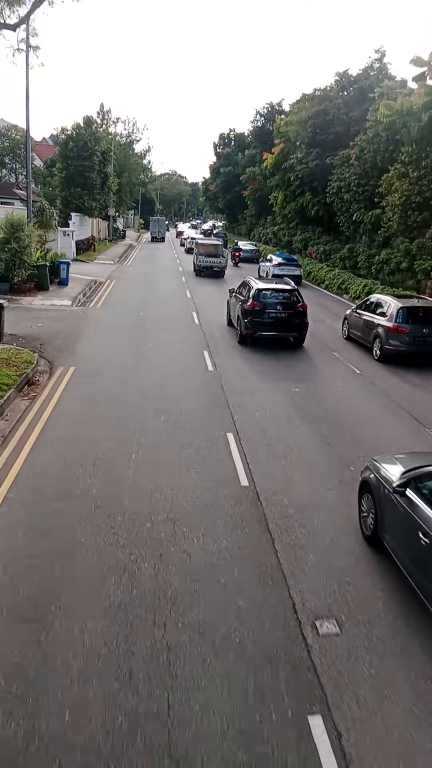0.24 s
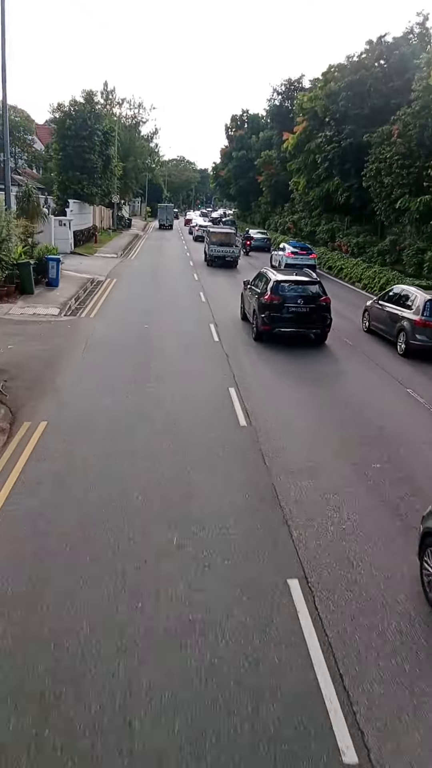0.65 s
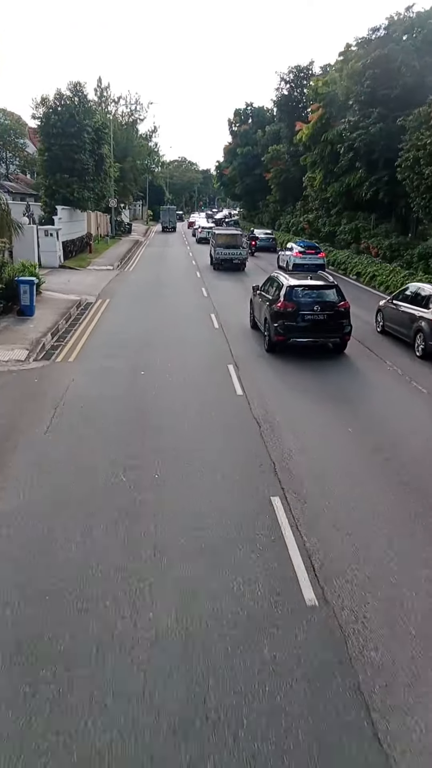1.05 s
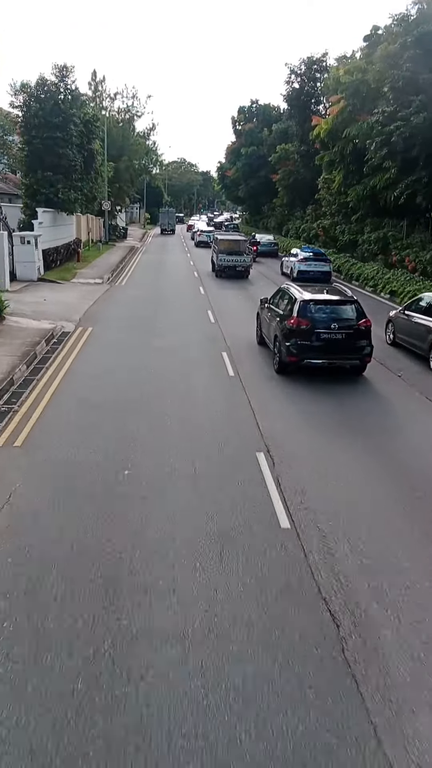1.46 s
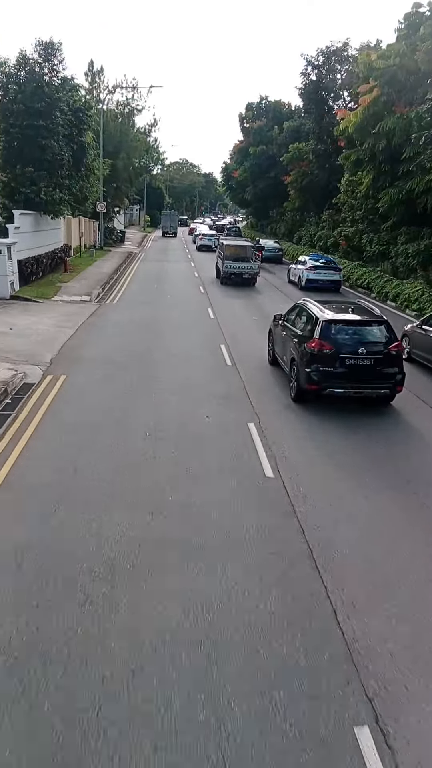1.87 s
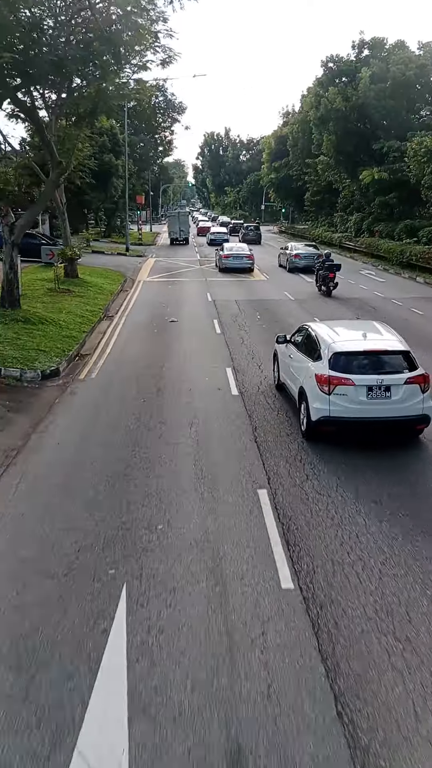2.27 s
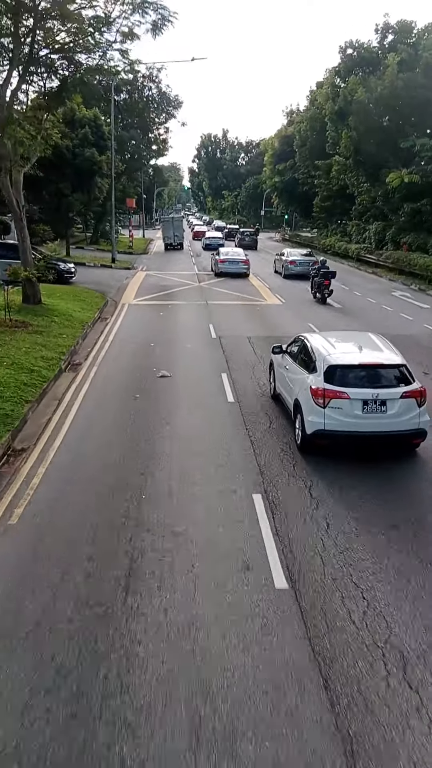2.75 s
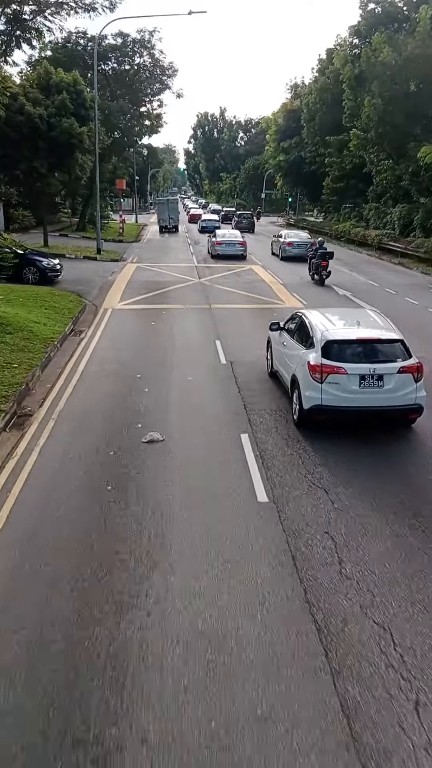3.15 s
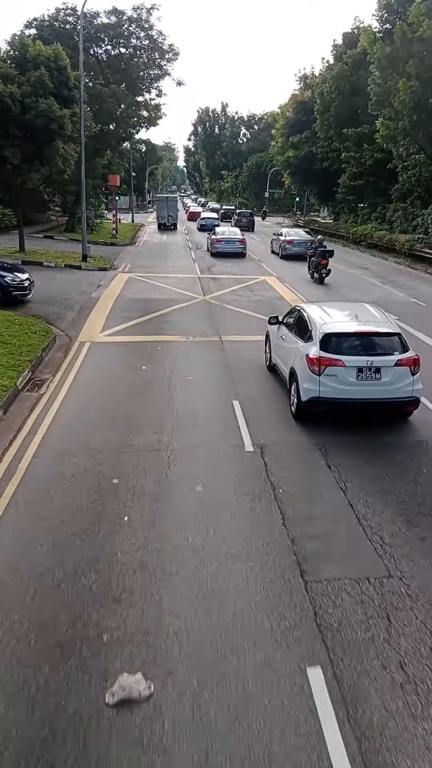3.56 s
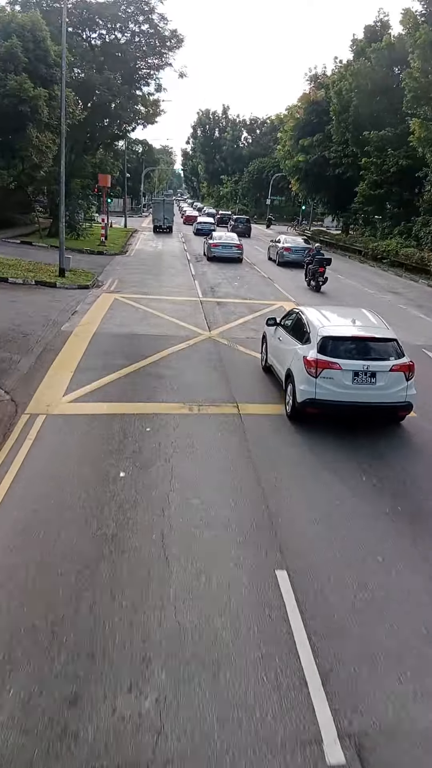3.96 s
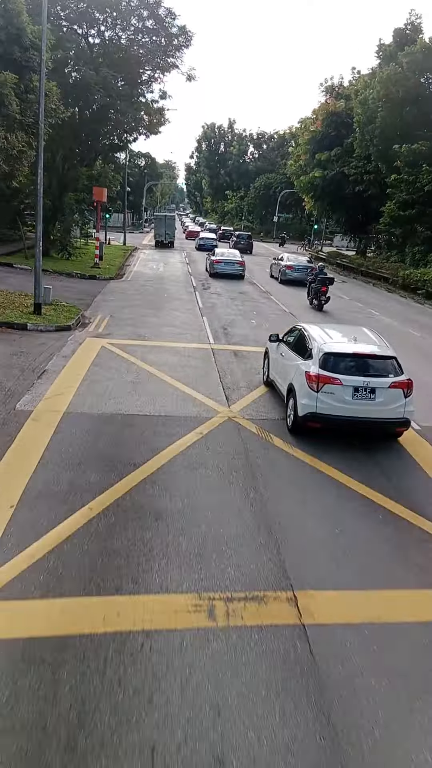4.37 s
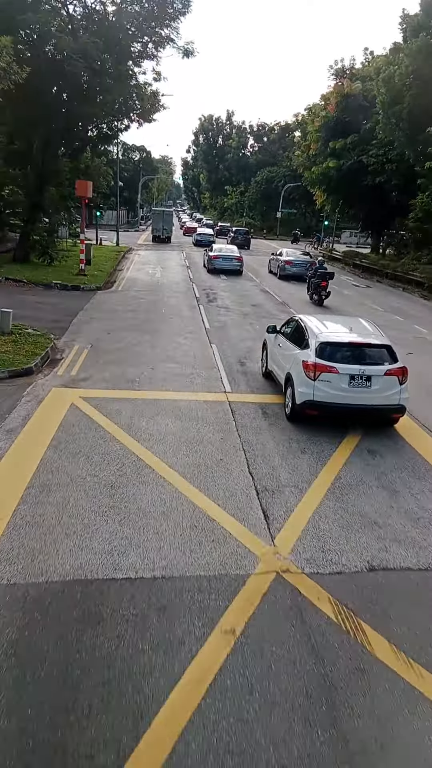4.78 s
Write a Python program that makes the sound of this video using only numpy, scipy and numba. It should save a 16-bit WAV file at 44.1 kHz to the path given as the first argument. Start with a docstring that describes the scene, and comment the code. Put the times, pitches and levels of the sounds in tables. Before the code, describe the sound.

The sound is heard inside a moving bus: a low rumble from the shaking body, with engine and tyres roaring through the floor throughout. From the start, loose trim clacks and taps and panels chatter over a low, wavering engine hum. One hard snap sounds close by at about 0.5 seconds, followed by dense rattling and thudding until about 1.7 seconds. A dry tick falls in a lull near 1.9 seconds. Another burst of clatter runs from about 2.4 to 2.8 seconds. From 3 to 4.3 seconds the ride is quieter, with a few light clacks around 3.5 seconds and a faint engine drone from about 3.8 to 4.4 seconds. Knocks return, with a strong clack near 4.8 seconds. From about 5.1 seconds to the end near 6, the trim and panels rattle hard over a swelling rumble, with a faint tick at 5.6 seconds.

```python
"""Inside a moving bus. The road shakes the body into a low rumble, and the engine and tyres roar through
the floor. At every axle bounce, loose trim clacks and the body shakes on for a moment. Trim taps on its
frame, panels chatter and the engine hums now and then. There is one hard snap close by.
The cabin sound has a deep dip near 5 kHz; two dry ticks sound on top."""
import sys
import numpy as np
from scipy import signal
from scipy.fft import rfft, irfft
from scipy.io import wavfile
from scipy.ndimage import uniform_filter1d
from numba import njit

SR = 44100
rng = np.random.default_rng(int(sys.argv[2]) if len(sys.argv) > 2 else 0)


def unload_audio(sound):
    """Save the sound as a 16-bit wav file, at the path given as the first command line argument."""
    columns = np.transpose(np.atleast_2d(sound))
    # keep every value between -1 and 1, then stretch to whole-number steps
    steps = np.round(np.clip(columns, -1, 1) * 32767)
    wavfile.write(sys.argv[1], SR, steps.astype(np.int16))


N = 269751
TIME = np.arange(N) / SR

# Tone of the body's deep boom and of its rumble (a tone says how strong each pitch is): f/Hz, level/dB
BOOM_TONE = [(18, -55), (22, -15.5), (57, -22), (75, -8), (98, -35), (160, -120)]
RUMBLE_TONE = [(38, -38.5), (65, -3), (124, 2), (194, 1.5), (253, -1.5), (290, -6), (330, -15), (430, -23),
               (730, -120)]
def body_rumble(level_db, jolt_db):
    """The road shakes the body of the bus; each jolt makes the rumble swell."""
    boom = patchy_noise(BOOM_TONE, bands=4, patch_db=5.5, rate_hz=13, flutter_db=5.5)
    rumble = patchy_noise(RUMBLE_TONE, bands=10, patch_db=7, rate_hz=9, flutter_db=0)
    return undb(level_db - 8) * boom + shaken_level(level_db, jolt_db + 2) * rumble


# Tone of the roar in the floor: f/Hz, level/dB
FLOOR_TONE = [(180, -21.5), (300, -6), (459, 0.5), (555, -7), (640, -12.5), (830, -28), (1410, -120)]
def floor_roar(level_db, knock_db):
    """Engine and tyres roar through the floor, louder after each knock."""
    roar = patchy_noise(FLOOR_TONE, bands=6, patch_db=13, rate_hz=10, flutter_db=0)
    return shaken_level(level_db, knock_db - 12.5) * roar


# Tone of the low and of the high tyre roar: f/Hz, level/dB
LOW_TYRE_TONE = [(340, -27), (560, -8), (680, 0.5), (800, -2.5), (950, -16), (1400, -48.5)]
HIGH_TYRE_TONE = [(550, -44.5), (760, -12), (870, -1), (1160, 1), (1400, -7.5), (1750, -45.5), (2280, -33),
                  (3850, -88)]
def tyre_roar(low_db, high_db, knock_db):
    """Rolling tyres roar in two bands; quiet tyres lose the top of their roar."""
    low = patchy_noise(LOW_TYRE_TONE, bands=4, patch_db=9.5, rate_hz=10, flutter_db=1)
    high = patchy_noise(HIGH_TYRE_TONE, bands=6, patch_db=13.5, rate_hz=10, flutter_db=1)
    dullness = np.clip(-45 - high_db, 0, 1)  # sets in below -45 dB
    high = high - dullness * bandpass(high, 1370, 250)
    bounce_db = knock_db - 13.5
    return shaken_level(low_db, bounce_db) * low + shaken_level(high_db, bounce_db) * high


# Tone of a hit's bright edge, of the trim, of the panels and of a knock through the floor: f/Hz, level/dB
EDGE_TONE = [(6180, -37), (10500, 0), (11600, -9.5), (13200, -17), (15500, -33)]
TRIM_TONE = [(2820, -31), (4800, -12), (5550, -9), (6950, 2), (8550, -0.5), (9430, -12.5), (10100, -9),
             (10800, -31), (14000, -42), (22000, -120)]
PANEL_TONE = [(1000, 24), (1700, -1), (1760, -7.5), (2050, -1.5), (3060, -6.5), (3410, -6), (3590, -10),
              (4150, -13), (4800, -42), (6240, -69), (10600, -120)]
KNOCK_TONE = [(70, -30), (130, -2), (230, 2.5), (330, -1), (460, 1), (650, -7.5), (1160, -9.5), (1750, -33),
              (2280, -62.5), (3850, -120)]
# Notes that the body and the loose panels ring with: f/Hz, level/dB, time to fade by 60 dB/s
BODY_RINGS = [(75.7, -27, 0.083), (117, 2.5, 0.11), (185, 10, 0.057), (183.7, 6, 0.48), (275, 10.5, 0.026),
              (393, 10.5, 0.041), (476, -1, 0.05)]
PANEL_RINGS = [(2050, 0, .04), (2380, -2, .04), (2580, 0, .05), (2900, -5, .04), (3340, -2, .04),
               (3720, -3, .04), (3970, -8, .035), (4450, -18, .04), (5430, -17, .04), (5760, -8, .04),
               (6400, -3, .04), (7100, 0, .03), (7800, 0, .04), (8250, 0, .04), (8860, -3, .04),
               (9900, -16, .03)]
TRIM_ABOVE_HZ = 5000  # higher rings follow the trim's level, lower ones the panels'
# Axle bounces: t/s, trim clack level/dB, panel clatter level/dB, knock level/dB, body jolt level/dB
BOUNCES = [(0.017, -35, -58, -40, -20), (0.1095, -45, -31, -22.5, -37), (0.2172, -27.5, -37, -38, -25),
           (0.256, -45, -42, -27.5, -36), (0.3376, -33, -53, -28, -26), (0.406, -28, -57, -30, -31),
           (0.593, -17.5, -33.5, -21.5, -18.5), (0.6473, -16, -27, -21, -15),
           (0.7354, -20, -26, -20.5, -32), (0.811, -26, -29.5, -25, -20), (0.8899, -24, -32.5, -19, -18.5),
           (0.9704, -32, -56, -25.5, -16.5), (1.0522, -29, -41, -25, -18), (1.1099, -31, -47, -24, -37),
           (1.2542, -26, -39, -34, -34), (1.27, -24, -36.5, -19, -33), (1.3375, -26.5, -45, -24, -18),
           (1.436, -27, -49, -22.5, -18), (1.5059, -36, -47, -28, -30), (1.577, -42, -75, -31.5, -22.5),
           (1.659, -29.5, -51, -29.5, -18), (2.394, -21, -34, -22, -23.5), (2.4653, -20, -34, -22, -18.5),
           (2.547, -27, -34.5, -27, -29), (2.611, -20.5, -43, -19.5, -17), (2.7268, -32, -36.5, -25, -23),
           (2.796, -47, -51, -30, -24.5), (2.9658, -42, -68, -34, -25), (3.466, -30.5, -46, -27, -26),
           (3.539, -32.5, -41.5, -26, -38), (3.594, -31.5, -52, -37, -25), (3.679, -35.5, -57, -36, -48),
           (4.3537, -37, -48, -24.5, -32.5), (4.4706, -44, -50, -27.5, -25.5),
           (4.627, -36, -42, -25, -24.5), (4.7198, -29, -40.5, -24, -18.5), (4.787, -19, -37.5, -19, -18.5),
           (4.876, -39, -41.5, -28.5, -22.5), (4.945, -36, -40, -46, -40),
           (5.151, -23, -37.5, -23.5, -24.5), (5.224, -21, -31, -22.5, -19), (5.28, -16.5, -31, -20, -18.5),
           (5.3534, -21.5, -33, -19.5, -23), (5.443, -15, -31.5, -18, -16.5), (5.509, -46, -37, -25, -25.5),
           (5.531, -23.5, -44, -25, -37), (5.5805, -36, -35, -24, -20.5), (5.7058, -27, -43, -26, -32),
           (5.8405, -31, -47, -25.5, -14.5), (5.849, -16, -35.5, -16.5, -25),
           (5.9162, -17.5, -30, -15, -19.5), (5.999, -25, -31, -33, -30), (6.0046, -23.5, -34.5, -21, -25),
           (6.0947, -29, -56, -27, -26)]
def clacks():
    """Loose parts hit and rebound at each bounce: a crack, a rustling tail, ringing body and panels."""
    times, trim_db, panel_db, knock_db, jolt_db = np.transpose(BOUNCES)
    luck = rng.standard_normal((len(times), len(BODY_RINGS) + len(PANEL_RINGS) + 1))
    rebound_s, rustle_s = 0.0064, 0.21
    rebound = undb(-1 + 2.5 * luck[:, len(BODY_RINGS)])
    edge_db = 2 * trim_db - 14.5  # harder clacks are brighter
    parts = [(EDGE_TONE, edge_db, .03, -4), (TRIM_TONE, trim_db - 19, .03, -5),
             (PANEL_TONE, panel_db - .5, .03, -4), (KNOCK_TONE, knock_db - 2, .05, -5)]
    out = 0
    for tone, part_db, crack_s, tail_db in parts:
        size = undb(part_db)
        hits = impulses(times, size) + impulses(times + rebound_s, size * rebound)
        crack_power = fade(hits ** 2, crack_s / 2)
        rustle_power = undb(2 * tail_db) * fade(hits ** 2, rustle_s / 2)
        loudness = soften_start(np.sqrt(crack_power + rustle_power), samples=90)
        uneven = undb(1.5 * wander(180))
        out = out + colour(loudness * uneven * rng.standard_normal(N), tone)
    for k, (hz, ring_db, fade_s) in enumerate(BODY_RINGS):
        size = np.tanh(luck[:, k]) * undb(jolt_db + ring_db - 20)
        out = out + ring(impulses(times, size), hz, fade_s)
    for k, (hz, ring_db, fade_s) in enumerate(PANEL_RINGS):
        hit_db = panel_db - 23 if hz < TRIM_ABOVE_HZ else trim_db - 39
        size = np.tanh(luck[:, -k - 1]) * undb(hit_db + ring_db)
        struck = ring(impulses(times, size), hz, fade_s)
        out = out + bandpass(struck, hz, 500)  # the ring takes a moment to build
    return out


def shaken_level(steady_db, bounce_db, rise_s=0.043, fade_s=0.27):
    """Loudness over time: a steady level plus the shaking that each bounce leaves behind."""
    kicks = impulses(np.transpose(BOUNCES)[0], undb(2 * bounce_db))
    shudder = np.sqrt(np.abs(fade(kicks, fade_s / 2) - fade(kicks, rise_s)))
    return np.hypot(undb(steady_db), shudder)


# Tone of a tap's bright middle and of its lower treble: f/Hz, level/dB
TAP_BRIGHT_TONE = [(5000, -50), (6000, -16), (6700, 2), (8550, 0), (9430, -14), (10500, -40)]
TAP_TREBLE_TONE = [(3600, -40), (4800, 4), (5600, 0), (6300, -8), (7200, -40)]
# Sharp taps, often in quick pairs: t/s, then level/dB of bright middle, panel, knock, lower treble, edge
TRIM_TAPS = [(0.0174, -29, -43, -23, -51, -55), (0.1111, -38, -39, -22, -57, -59),
             (0.2169, -26, -37, -24, -43, -39), (0.2269, -24, -41, -29, -52, -49),
             (0.2524, -41, -40, -28, -57, -64), (0.405, -40, -46, -27, -55, -62),
             (0.5921, -28, -41, -29, -56, -41), (0.5964, -25, -40, -22, -42, -46),
             (0.6484, -24, -34, -21, -48, -43), (0.6554, -25, -36, -22, -42, -46),
             (0.7357, -21, -32, -22, -41, -48), (0.7414, -26, -35, -22, -40, -50),
             (0.8066, -34, -40, -23, -55, -58), (0.8124, -34, -39, -23, -55, -55),
             (0.8854, -31, -41, -24, -53, -49), (0.8919, -24, -35, -22, -49, -47),
             (0.9712, -37, -45, -24, -57, -64), (1.051, -34, -43, -29, -53, -53),
             (1.0564, -31, -40, -26, -52, -54), (1.1119, -27, -42, -25, -51, -56),
             (1.1757, -39, -46, -23, -62, -66), (1.2535, -29, -38, -22, -51, -57),
             (1.2715, -28, -38, -19, -48, -53), (1.2814, -33, -41, -24.5, -50, -54),
             (1.3189, -32, -48, -27, -48, -54), (1.3244, -33, -43, -23, -47, -52),
             (1.3404, -30, -43, -22, -48, -58), (1.4017, -35, -47, -26, -56, -59),
             (1.4386, -36, -48, -23, -63, -58), (1.4424, -36, -48, -23, -55, -61),
             (1.5065, -38, -52, -28, -74, -63), (1.5104, -36, -51, -26, -64, -66),
             (1.5768, -44, -61, -30, -74, -76), (1.5814, -42, -58, -27, -70, -73),
             (1.6571, -35, -61, -28, -53, -53), (1.6624, -32, -54, -25, -51, -57),
             (2.3915, -29, -42, -23, -57, -51), (2.3994, -30, -41, -24, -54, -50),
             (2.4034, -29, -38, -26, -46, -50), (2.4648, -29, -42, -25, -42, -48),
             (2.4704, -26, -40, -24, -42, -48), (2.5461, -36, -38, -26, -54, -54),
             (2.613, -27, -40, -22, -51, -46), (2.6164, -26, -40, -22, -40, -53),
             (2.6713, -36, -43, -27, -56, -66), (2.7312, -29, -40, -26, -59, -62),
             (2.7975, -35, -47, -31, -68, -73), (2.9714, -42, -55, -33.5, -69, -75),
             (3.4615, -35, -56, -35, -58, -64), (3.471, -33, -54, -31, -57, -67),
             (3.5932, -37, -55, -34, -61, -66), (4.0272, -49, -57, -33, -80, -69),
             (4.3604, -47, -53, -27, -73, -77), (4.4707, -40, -58, -30, -77, -70),
             (4.4744, -38, -54, -30, -65, -74), (4.6284, -29, -46, -28, -59, -64),
             (4.7192, -34, -50, -27, -66, -70), (4.7406, -38, -47, -30, -69, -67),
             (4.7875, -23, -43, -23, -44, -42), (4.7934, -26, -44, -22, -43, -46),
             (4.8763, -32, -45, -26, -64, -64), (5.1527, -33, -38, -25, -55, -51),
             (5.2245, -24, -34.5, -22, -49, -49), (5.2734, -26, -40, -22, -54, -41),
             (5.2824, -25, -39, -23, -52, -40), (5.2874, -26, -38, -22, -45, -44),
             (5.3517, -30, -45, -23, -58, -48), (5.3554, -29, -39, -21, -48, -51),
             (5.4364, -28, -39, -22, -58, -42), (5.4425, -26, -41, -25, -45, -42),
             (5.4484, -27, -39, -21, -44, -49), (5.5094, -35, -38, -24, -55, -62),
             (5.5308, -30, -43, -24, -51, -54), (5.5802, -29, -39, -25, -56, -57),
             (5.7084, -33, -45, -26, -55, -57), (5.8426, -29, -45, -23, -57, -41),
             (5.8496, -23, -45, -22, -39, -41), (5.8556, -23, -40, -20, -37, -44),
             (5.9165, -22, -37, -18, -45, -47), (5.9214, -22, -37, -18, -39, -49),
             (5.9974, -27, -38, -27, -41, -47), (6.0048, -24, -35, -22, -41, -50),
             (6.0954, -36, -49, -29, -56, -58), (6.1025, -32, -46, -30, -58, -54)]
def taps(tap_s=0.0095, knock_s=0.02):
    """Trim hits its frame: a gritty burst through trim, panels and floor, with a brief panel ring."""
    times, bright_db, panel_db, knock_db, treble_db, edge_db = np.transpose(TRIM_TAPS)
    grit = rng.standard_normal(N)
    luck = rng.standard_normal((len(times), len(PANEL_RINGS)))  # each tap rings its own way
    parts = [(TAP_BRIGHT_TONE, bright_db + .5, tap_s), (TAP_TREBLE_TONE, treble_db + 3, tap_s),
             (EDGE_TONE, edge_db + 1.5, tap_s), (PANEL_TONE, panel_db + 2.5, 2 * tap_s),
             (KNOCK_TONE, knock_db - 2.5, knock_s)]
    out = 0
    for tone, part_db, fade_s in parts:
        loudness = soften_start(fade(impulses(times, undb(part_db)), fade_s), samples=21)
        out = out + colour(loudness * grit, tone)
    for k, (hz, ring_db, fade_s) in enumerate(PANEL_RINGS):
        hit_db = panel_db if hz < TRIM_ABOVE_HZ else bright_db
        size = luck[:, k] * undb(hit_db + ring_db - 21)
        out = out + bandpass(ring(impulses(times, size), hz, fade_s / 2), hz, 900)
    return out


# One hard snap close by: t/s, level/dB
HARD_SNAP = [(.4545, -1.2)]
def snap():
    """A quick pull on the air, then a push that swings back, ringing the microphone's bright peak."""
    times, db = np.transpose(HARD_SNAP)
    t = np.arange(200) / SR - .0003
    pull = -.75 * np.exp(-((t + .00011) / .00012) ** 2)
    push = (t > 0) * .75 * np.cos(2 * np.pi * 700 * t) * np.exp(-t / .0004)
    bright = -.5 * np.cos(2 * np.pi * 7800 * (t + .00004)) * np.exp(-np.abs(t) / .00016)
    crack = np.convolve(impulses(times, undb(db)), pull + push + bright)[:N]
    return signal.sosfilt(signal.butter(2, 13000, fs=SR, output="sos"), crack)


# The engine's low hum, a deeper hum near 50 Hz that stops abruptly, a higher drone: t/s, f/Hz, level/dB
ENGINE_HUM = [(0.0, 82.4, -14), (0.12, 76.5, -52), (0.232, 64.3, -28), (0.518, 62.8, -33),
              (0.64, 73.75, -27), (0.874, 65.2, -30), (1.002, 79.5, -32.5), (1.056, 81, -20.5),
              (1.15, 73.9, -43)]
DEEP_HUM = [(1.2, 50.4, -51), (1.232, 50, -32), (1.442, 49.7, -32), (1.462, 49.3, -31), (1.48, 48.3, -39),
            (1.912, 51.3, -29.5), (1.945, 49.2, -61)]
ENGINE_DRONE = [(3.72, 247, -66), (3.77, 216.4, -48), (3.83, 228, -31.5), (3.86, 221, -47),
                (3.886, 234, -36), (3.922, 217, -40), (3.958, 219, -50), (3.988, 217, -32),
                (4.016, 236.4, -42), (4.082, 226.6, -30.5), (4.112, 231, -47), (4.128, 230, -38),
                (4.144, 226.6, -71), (4.22, 216, -31), (4.244, 221, -47), (4.288, 223, -33.5),
                (4.31, 219, -52), (4.322, 220, -37), (4.348, 221, -48), (4.362, 232.4, -34),
                (4.41, 249, -32), (4.45, 258, -60)]
def engine_note(table, pitch_waver, waver_db):
    """One note of the engine rings in the cabin, wavering in pitch and loudness."""
    times, hz, db = np.transpose(table)
    playing = uniform_filter1d(1. * ((TIME > times[0]) & (TIME < times[-1])), size=1000)
    pitch_hz = np.interp(TIME, times, hz) * (1 + pitch_waver * wander(45))
    loudness = undb(np.interp(TIME, times, db) + waver_db * wander(40))
    return playing * np.sqrt(2) * loudness * np.sin(2 * np.pi * np.cumsum(pitch_hz) / SR)


def loose_contacts(per_s, spread_db):
    """Loose parts touch at random: tiny clicks, a few much bigger than the rest."""
    size = undb(spread_db * np.minimum(rng.exponential(size=N), 4.5)) * rng.standard_normal(N)
    return normalise(size * (rng.random(N) < per_s / SR))


def jingle(contacts, low_hz, high_hz, fade_share, swell_db):
    """The clicks ring now one panel note, now another; the pitches drift as the panels flex."""
    out = 0
    for hz, db, fade_s in PANEL_RINGS:
        if low_hz < hz < high_hz:
            pitch_hz = hz * (1 + .035 * wander(9))
            spin = np.exp(2j * np.pi * np.cumsum(pitch_hz) / SR)
            note = (fade(contacts / spin, fade_share * fade_s) * spin).imag  # rings at the moving pitch
            loudness = undb(db + swell_db * np.minimum(wander(28), .6))
            out = out + loudness * normalise(bandpass(note, hz, 600))
    return normalise(out)


def panel_chatter(contacts, level_db, clatter_db):
    """Loose panels rustle, ring and click, louder after each bounce."""
    rustle = patchy_noise(PANEL_TONE, bands=14, patch_db=16.5, rate_hz=20, flutter_db=4)
    rings = jingle(contacts, 0, TRIM_ABOVE_HZ, fade_share=.97, swell_db=12.5)
    clicks = colour(contacts, PANEL_TONE)
    return shaken_level(level_db, clatter_db - 6.5) * (rustle + .85 * rings + .35 * clicks)


# Tone of the trim's fine, high rattle: f/Hz, level/dB
SIZZLE_TONE = [(2820, -68), (4800, -44.5), (5480, -5), (5930, -34), (6470, 1.5), (8520, 6.5), (8990, 0),
               (9350, -12), (10100, -9), (11600, -32), (15500, -27)]
def trim_sizzle(contacts, level_db, clack_db):
    """Loose trim buzzes: a hiss, high rings, clicks and a faint bright edge, louder after each bounce."""
    hiss = patchy_noise(SIZZLE_TONE, bands=24, patch_db=9.5, rate_hz=24, flutter_db=5)
    rings = jingle(contacts, TRIM_ABOVE_HZ, SR, fade_share=.55, swell_db=12)
    clicks = colour(contacts, SIZZLE_TONE)
    edge = patchy_noise(EDGE_TONE, bands=10, patch_db=3, rate_hz=43, flutter_db=3.5)
    sizzle = hiss + .68 * rings + .39 * clicks + undb(-26.5) * edge
    return shaken_level(level_db, clack_db - 26) * sizzle


# Dry ticks: t/s, level/dB
DRY_TICKS = [(1.936, -24.5), (5.6025, -35)]
def ticks():
    """Each tick is a sudden step that dies away without ringing."""
    times, db = np.transpose(DRY_TICKS)
    return -fade(impulses(times, undb(db)), fade_s=0.016)


# Brief dips and swells in the steady noise: t/s, length/s, f/Hz, width/Hz, level change/dB
DIPS_AND_SWELLS = [(0.545, .08, 2800, 1500, -11), (0.968, .05, 4000, 1000, -13), (.15, .06, 11500, 3000, 6),
                   (.225, .05, 13000, 4000, 10), (1.792, 0.083, 610, 250, -16),
                   (1.87, 0.095, 930, 250, -20), (2.04, 0.048, 960, 250, -13),
                   (2.075, 0.074, 520, 400, -11), (2.13, .06, 905, 250, -8), (2.237, 0.13, 372, 150, -15),
                   (2.335, .08, 970, 200, -4), (3.013, 0.096, 1030, 300, -14), (3.113, 0.078, 550, 250, -7),
                   (3.203, 0.083, 300, 150, -3), (3.217, 0.098, 500, 100, 10.5),
                   (3.3, 0.056, 960, 350, -15), (3.34, 0.17, 540, 200, -14), (3.383, .08, 750, 200, 7.5),
                   (3.658, 0.15, 1040, 300, 3), (3.826, 0.13, 1000, 400, -18), (3.88, .08, 420, 250, -10),
                   (4.023, 0.46, 930, 90, 6), (4.134, 0.22, 642, 150, -10), (4.15, 0.36, 330, 90, -14),
                   (4.22, 0.072, 567, 200, -10), (4.323, 0.065, 790, 200, -10),
                   (4.302, 0.089, 1270, 300, -8), (4.76, 0.086, 3000, 500, -10),
                   (4.818, 0.096, 3840, 700, 9.5), (4.845, .06, 3000, 500, -10),
                   (4.86, .07, 5850, 700, -10), (4.92, 0.078, 5800, 900, -14),
                   (4.932, 0.044, 3300, 1000, -15), (5.002, 0.072, 3200, 500, 6),
                   (5.036, 0.13, 376, 150, -12), (5.07, 0.089, 3200, 900, -14),
                   (5.162, 0.076, 2200, 600, 7), (5.2, .04, 5600, 700, -10), (5.253, 0.045, 3600, 500, -8),
                   (5.66, .05, 11500, 3000, 7), (3.75, .3, 85, 40, 5), (2.92, .04, 8000, 3000, 4),
                   (3.0, .03, 7500, 3000, -5), (3.18, .02, 8000, 3000, -5), (3.74, .07, 1250, 300, -8),
                   (3.93, .08, 1200, 300, -8), (4.12, .18, 1200, 250, -5), (1.0, .8, 1150, 300, -3),
                   (5.797, 0.088, 1800, 600, -4)]
def dip_and_swell(noise):
    """Bands of the noise briefly go hollow or grow louder, then come back."""
    for middle_s, length_s, hz, width_hz, db in DIPS_AND_SWELLS:
        window = np.exp(-(2 * (TIME - middle_s) / length_s) ** 4)
        noise = noise + (undb(db) - 1) * window * bandpass(noise, hz, width_hz)
    return noise


def patchy_noise(tone, bands, patch_db, rate_hz, flutter_db):
    """Noise whose narrow bands swell and fade on their own, plus a flutter they all share."""
    edges = np.geomspace(tone[1][0], tone[-2][0], bands + 1)
    noise = rng.standard_normal(N)
    out = 0
    for low_hz, high_hz in zip(edges, edges[1:]):
        hz, width_hz = np.sqrt(low_hz * high_hz), 1.5 * (high_hz - low_hz)
        band = bandpass(bandpass(noise, hz, width_hz), hz, width_hz)  # twice for steep sides
        out = out + undb(patch_db * np.minimum(wander(rate_hz), .12)) * band  # dips deep, hardly rises
    return normalise(colour(out * undb(flutter_db * wander(24.65)), tone))


def colour(x, tone):
    """Give a sound the tone in a table; plain noise keeps its level."""
    hz, db = np.transpose(tone)
    grid_hz = np.maximum(np.fft.rfftfreq(2 ** 14, 1 / SR), 1)
    gain_db = np.maximum(np.interp(np.log(grid_hz), np.log(hz), db, -80, -80), -80)
    cepstrum = irfft(gain_db * np.log(10) / 20)
    cepstrum[1:2 ** 13] *= 2  # folded so that nothing sounds before its hit (minimum phase)
    cepstrum[2 ** 13 + 1:] = 0
    response = irfft(np.exp(rfft(cepstrum)))
    return signal.fftconvolve(x, response / np.sqrt(np.sum(response ** 2)))[:N]


@njit
def bandpass(x, hz, width_hz):
    """Keep the pitches around hz, at full strength in the middle (a state-variable filter)."""
    out, band_state, low_state = np.empty(len(x)), 0., 0.
    tuning, damping = np.tan(np.pi * hz / SR), width_hz / hz
    for i in range(len(x)):
        band = (band_state + tuning * (x[i] - low_state)) / (1 + tuning * (tuning + damping))
        band_state = 2 * band - band_state
        low_state += 2 * tuning * band
        out[i] = damping * band
    return out


def wander(rate_hz):
    """A smooth random curve that heads for a new value rate_hz times a second."""
    hold = int(SR / rate_hz)
    steps = np.repeat(rng.standard_normal(N // hold + 1), hold)
    return uniform_filter1d(uniform_filter1d(steps, hold), hold)[:N]


def impulses(times, sizes):
    """Silence with one spike at each given time."""
    x = np.zeros(N)
    np.add.at(x, (times * SR).astype(int), sizes)
    return x


def fade(x, fade_s):
    """Give each spike a tail that falls by 60 dB in fade_s."""
    return signal.lfilter([1], [1, -np.exp(-np.log(1000) / (fade_s * SR))], x)


def ring(x, hz, fade_s):
    """Turn each spike into a note that falls by 60 dB in fade_s."""
    return signal.lfilter([1], [1, -np.exp(2j * np.pi * hz / SR - np.log(1000) / (fade_s * SR))], x).imag


def soften_start(x, samples):
    """Average the last few samples, because a hit is never instant."""
    return uniform_filter1d(x, size=samples, origin=(samples - 1) // 2)


def undb(db):
    """Turn decibels into a number to multiply by."""
    return 10 ** (np.asarray(db) / 20)


def normalise(x):
    """Scale a sound to an average power of 1."""
    return x / np.sqrt(np.mean(x ** 2))


# The ride between jolts: t/s, then level/dB of rumble, floor, low tyre, high tyre, panels, trim
RIDE_LEVELS = [(0.0, -25.5, -26.5, -33.5, -32, -41.5, -49), (0.15, -22, -30.5, -40.5, -37.5, -55.5, -50.5),
               (0.31, -28, -31.5, -33.5, -41, -44, -51.5), (0.43, -27, -36, -41.5, -37.5, -52, -60.5),
               (0.61, -24.5, -31, -33, -36, -49, -54), (0.77, -22, -29.5, -37, -35, -44.5, -45.5),
               (0.94, -32.5, -35, -42, -37.5, -51, -57), (1.07, -25, -35, -38, -33.5, -45, -52),
               (1.26, -25.5, -29, -42, -38.5, -55, -54.5), (1.35, -25, -28.5, -40, -36, -45.5, -47),
               (1.5, -30, -34.5, -41, -38, -56.5, -57), (1.58, -37, -37.5, -43, -42.5, -64, -56),
               (1.7, -28.5, -36.5, -37, -39.5, -65, -68), (1.79, -31, -33, -50, -43.5, -58.5, -63),
               (1.89, -26.5, -34.5, -45, -37.5, -67, -64), (1.96, -47, -37, -39, -43, -63.5, -59),
               (2.11, -42.5, -46, -45, -41, -59.5, -55), (2.21, -27.5, -35, -37.5, -43.5, -50.5, -56.5),
               (2.35, -31, -38.5, -41.5, -40, -54, -57), (2.43, -29, -36, -35, -36, -40.5, -46),
               (2.57, -28.5, -34.5, -36, -37, -47, -51.5), (2.64, -29, -34, -41.5, -35, -42.5, -51),
               (2.76, -32, -38.5, -41, -38, -49, -56), (2.93, -33, -39.5, -40.5, -41.5, -60.5, -62),
               (3.12, -39.5, -42.5, -38.5, -46.5, -66, -67), (3.22, -53.5, -47, -52.5, -42, -64.5, -67.5),
               (3.41, -40.5, -49, -44.5, -47, -67, -66), (3.58, -31, -36.5, -44, -42, -60, -56.5),
               (3.68, -44, -48, -39.5, -46.5, -67, -61), (3.76, -36.5, -49, -50.5, -51, -71.5, -80),
               (3.969, -45, -43.5, -40, -48, -69.5, -76), (4.07, -47, -44.5, -42, -41.5, -63.5, -59),
               (4.17, -47.5, -45.5, -41.5, -43, -68.5, -68.5), (4.29, -46, -37.5, -44, -44.5, -63, -68),
               (4.41, -41, -37, -44, -41, -63.5, -61), (4.53, -35.5, -40, -41, -46, -63, -58),
               (4.72, -29.5, -41, -45, -38.5, -66, -62), (4.89, -38, -40, -39, -40.5, -57.5, -56.5),
               (5.11, -25.5, -42, -41.5, -38, -50.5, -53.5), (5.23, -27.5, -38, -36, -35.5, -47.5, -56),
               (5.33, -27.5, -37, -43, -45, -48, -48.5), (5.4, -28, -39, -40, -40, -51, -53),
               (5.49, -29, -33, -37, -36.5, -46.5, -57), (5.64, -35.5, -39, -40.5, -38, -54, -51),
               (5.83, -31.5, -33, -45, -40.5, -57.5, -58.5), (5.91, -23, -41, -38.5, -35, -53, -57),
               (6.01, -25.5, -43, -42, -39, -48, -50), (6.12, -28.5, -36, -39, -38, -49, -54)]
def scene():
    """Add up the cabin sound, give it a dip near 5 kHz, then put the ticks and a faint hiss on top."""
    times, *columns = np.transpose(RIDE_LEVELS)
    levels = [np.interp(TIME, times, column) for column in columns]
    rumble_db, floor_db, low_tyre_db, high_tyre_db, panel_db, trim_db = levels
    _, clack_db, clatter_db, knock_db, jolt_db = np.transpose(BOUNCES)
    ride = body_rumble(rumble_db, jolt_db) + floor_roar(floor_db, knock_db)
    ride += tyre_roar(low_tyre_db, high_tyre_db, knock_db)
    contacts = loose_contacts(per_s=1500, spread_db=2.6)
    rattle = panel_chatter(contacts, panel_db, clatter_db) + trim_sizzle(contacts, trim_db, clack_db)
    engine = engine_note(ENGINE_HUM, pitch_waver=.085, waver_db=.5)
    engine += engine_note(DEEP_HUM, pitch_waver=.045, waver_db=-1.5)
    engine += engine_note(ENGINE_DRONE, pitch_waver=.0545, waver_db=3.5)
    cabin = dip_and_swell(ride + rattle) + engine + clacks() + taps() + snap()
    heard = cabin - bandpass(cabin, hz=4846, width_hz=1700)  # the microphone's opening makes this dip
    microphone_hiss = undb(-90) * rng.standard_normal(N)
    return (heard + ticks() + microphone_hiss)[None]


def record(dry):
    """The microphone loses the deepest bass and softens the top; the recorder cuts off the very top."""
    thinned = signal.sosfilt(signal.butter(2, 39.4, "high", fs=SR, output="sos"), dry)
    softened = signal.sosfilt(signal.butter(4, 14800, fs=SR, output="sos"), thinned)
    return signal.sosfilt(signal.ellip(10, .2, 50, 15640, fs=SR, output="sos"), softened)


dry = scene()
out = record(dry)
unload_audio(out)
```